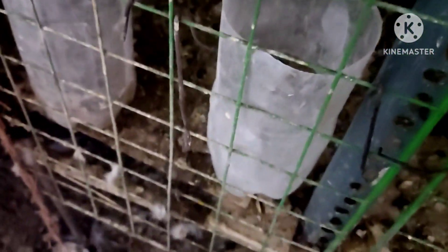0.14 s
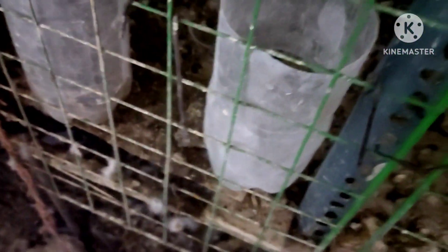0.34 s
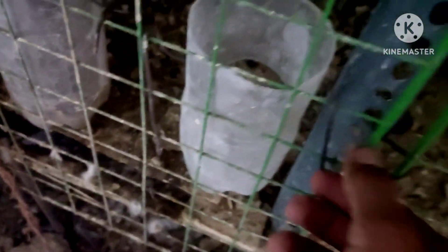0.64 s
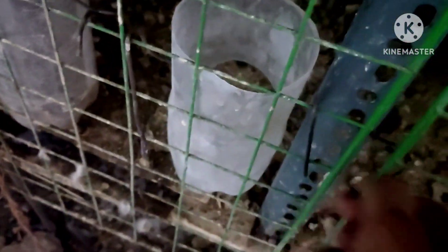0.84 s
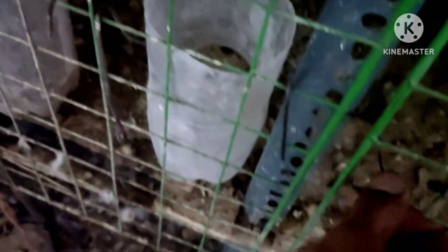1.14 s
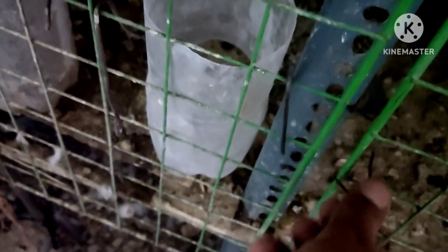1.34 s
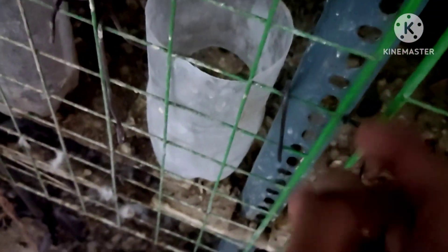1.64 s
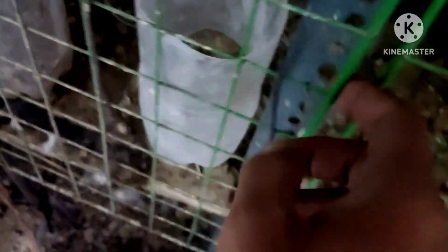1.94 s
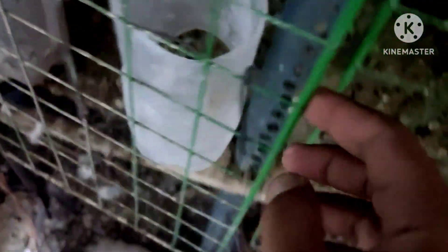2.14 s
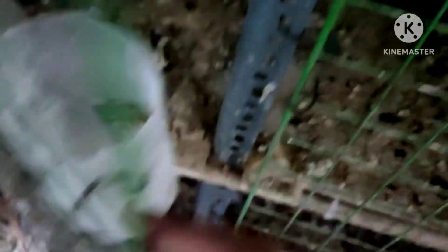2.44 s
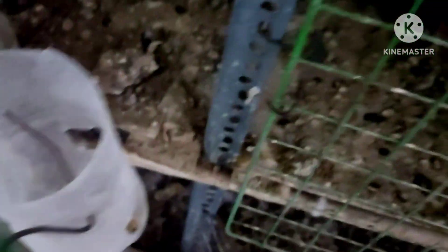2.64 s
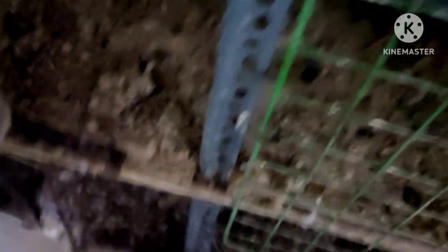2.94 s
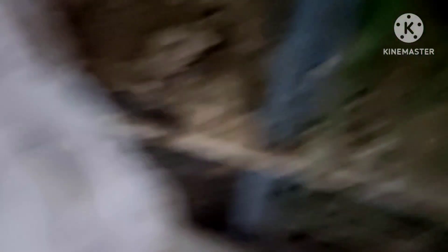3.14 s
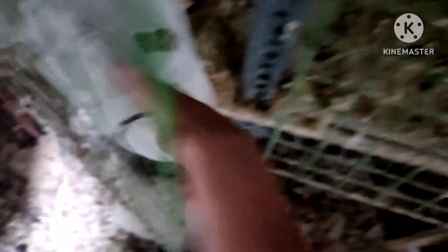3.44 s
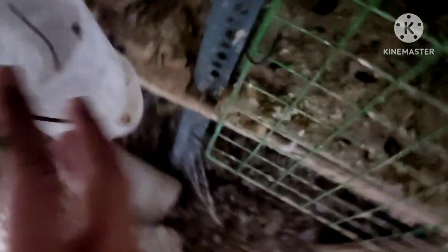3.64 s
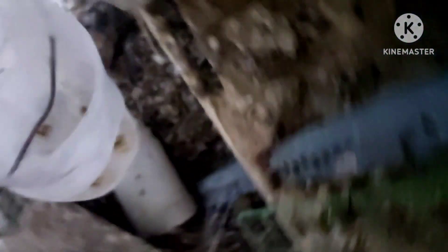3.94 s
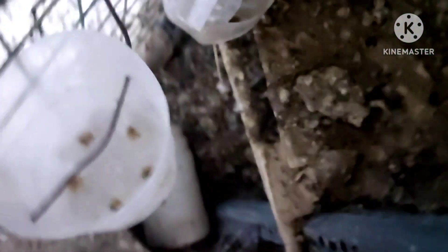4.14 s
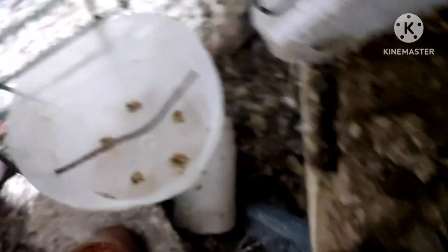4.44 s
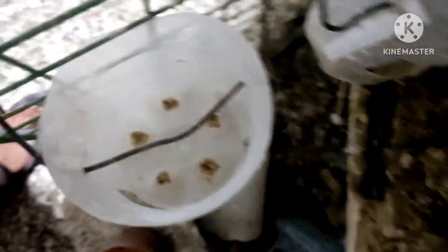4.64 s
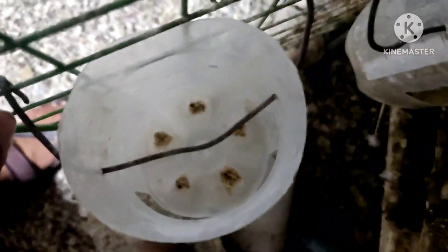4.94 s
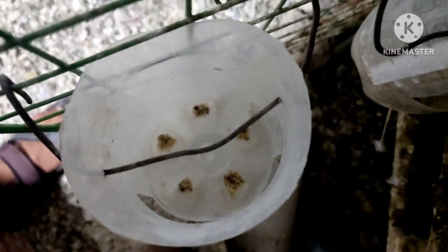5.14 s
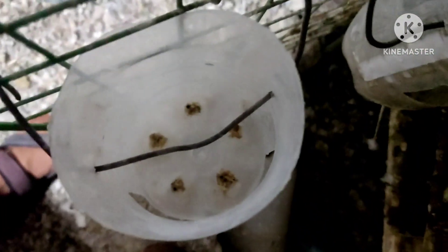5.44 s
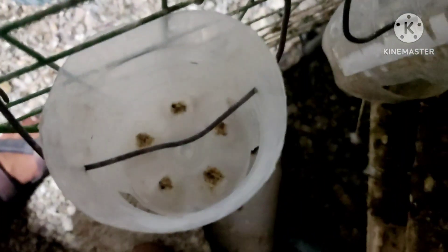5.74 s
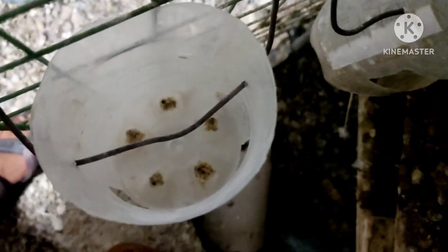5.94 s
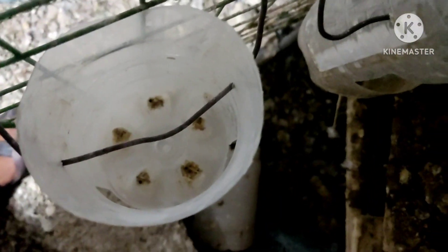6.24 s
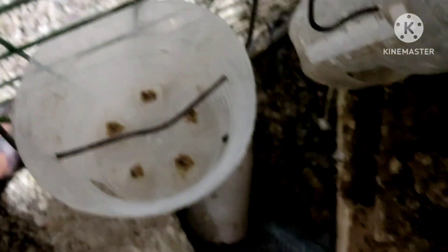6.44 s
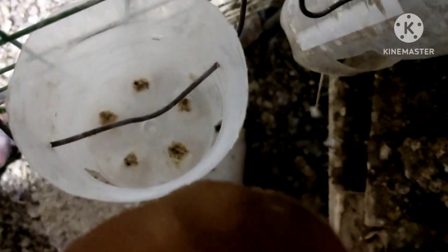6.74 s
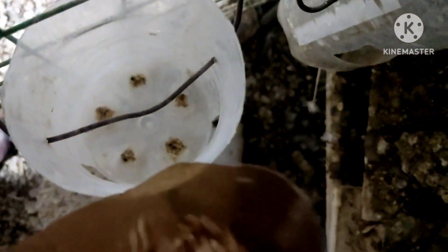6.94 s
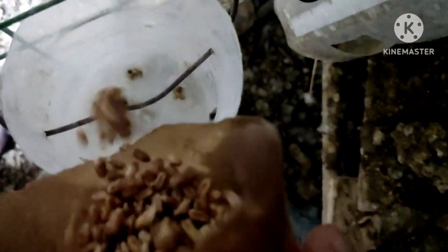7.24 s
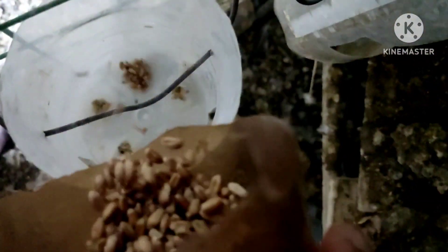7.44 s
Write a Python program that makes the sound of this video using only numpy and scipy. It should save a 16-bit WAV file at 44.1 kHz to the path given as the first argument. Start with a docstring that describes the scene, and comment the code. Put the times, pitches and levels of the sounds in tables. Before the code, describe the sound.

Close in a small pigeon loft, fingers knock and drag a wire door and plastic cup amid soft feathery rustling. Squabs give thin wavering whistles and an adult coos very faintly. The door swings with clattering mesh and low phone shudder; sharp finger taps thump the left side. After a quieter stretch, dry grain trickles, then rattles loudly into the hollow cup.

```python
"""Wire cage and grain in a pigeon loft

A hand drags and knocks a wire cage door and a plastic feed cup, then starts to pour grain: noise bursts and
grains of noise drive resonances and broad colours, seeds and wires add short damped sines.
Young pigeons peep in two-voiced sine whistles, an adult coos faintly; filtered noise makes feed and feathers rustle.
The hand-held phone rumbles as it moves; finger taps chirp through its casing, loudest on the left."""
import sys
import numpy as np
from scipy import signal
from scipy.fft import rfft, irfft, next_fast_len
from scipy.io import wavfile
from scipy.ndimage import map_coordinates

SR = 44100
rng = np.random.default_rng(int(sys.argv[2]) if len(sys.argv) > 2 else 0)


def master_out(mix):
    """Clip the mix to full scale and print it as 16-bit PCM to the path in sys.argv[1]."""
    frames = np.transpose(np.atleast_2d(mix))
    ceiling = np.clip(frames, -1, 1)
    pcm = np.round(ceiling * 32767).astype(np.int16)
    wavfile.write(sys.argv[1], SR, pcm)


N = 334278

# Relative levels are offset where they are used.
# Air and arm movement on the microphones. Each row: time in seconds, relative level in dB.
RUMBLE_LEVELS = [(0.0, -66), (0.46, -68), (1.12, -69), (1.35, -70.5), (1.83, -72), (2.7, -67), (3.08, -61),
                 (3.21, -52.5), (3.63, -63.5), (4.14, -51.5), (4.5, -68), (4.79, -59.5), (5.05, -72),
                 (5.83, -63), (6.33, -71), (6.93, -61), (7.11, -46), (7.58, -43.5)]
# Colour of the rumble. Each row: frequency in Hz, gain in dB.
BUFFET_COLOUR = [(8, 2.5), (22, 1.5), (45, -7), (80, -17.5), (160, -22), (400, -31), (2000, -100)]
# Colour of the phone's shudder. Each row: frequency in Hz, gain in dB.
JOLT_COLOUR = [(10, -8), (35, -6), (70, -8.5), (110, -12), (200, -27.5), (400, -65.5), (2000, -100)]
# Finger taps on the casing. Each row: time in seconds, peak in dB, corner in Hz (low: soft pad, high: nail).
FINGER_TAPS = [(2.1037, -39, 2010), (2.377, -44, 1710), (3.193, -38.5, 2630), (3.33, -33.5, 2800),
               (3.348, -22.5, 2110), (3.3752, -11, 1620), (3.454, -40, 2930), (3.475, -42, 2980),
               (3.986, -36.5, 2620), (4.336, -42, 1940), (4.496, -35.5, 2460), (4.53, -42, 1100),
               (5.4408, -6.5, 497), (5.699, -44, 1730), (6.086, -45.5, 1200), (6.489, -41.5, 860)]
# Spectrum of a fingertip's touch. Each row: frequency as a share of the corner, gain in dB.
TOUCH_COLOUR = [(.02, -26.5), (.12, -8), (.35, -4.5), (.62, 1), (.9, 0.5), (1.15, -7), (1.6, -28.5),
                (3.5, -37), (8, -67), (40, -94)]
# Transmission of the casing. Each row: frequency in Hz, gain in dB.
CASING_COLOUR = [(10, -59), (45, -16), (80, -1.5), (140, -6), (240, -1.5), (400, 1), (700, -3),
                 (1900, -5.5), (3000, 3), (4400, 11), (6000, 5), (8500, 8), (10500, -45), (16000, -67)]
# Adult coos. Each row: start in seconds, length in seconds, pitch in Hz, pitch rise in Hz per s, level in dB.
COO_NOTES = [(1.082, 0.13, 453.5, -130, -56), (1.254, 0.097, 420, 350, -52), (1.9, 0.049, 441, 100, -50)]
# Peeps of the far squab, one curve each. Each row: time in seconds, pitch in Hz, level in dB.
FAR_PEEP_CURVES = [
    [(0.015, 4020, -78), (0.06, 4020, -74), (0.12, 4040, -80), (0.19, 4075, -73), (0.26, 4075, -79),
     (0.29, 4068, -83), (0.314, 3991, -77), (0.338, 3679, -68), (0.35, 3589, -78)],
    [(6.44, 4279, -74), (6.484, 4331, -70), (6.53, 4300, -66), (6.566, 4277, -63), (6.59, 4308, -67),
     (6.61, 4198, -82)],
    [(6.63, 4259, -73), (6.66, 4312, -67), (6.68, 4332, -68), (6.698, 4273, -61), (6.712, 4190, -67),
     (6.738, 4083, -71)],
]
# Begging peeps of the near squab, one curve each.
# Each row: time in seconds, pitch in Hz, level in dB, octave level in dB.
NEAR_PEEP_CURVES = [
    [(2.04, 3270, -70, -80), (2.052, 3330, -67, -68), (2.095, 3370, -59.5, -82), (2.15, 3420, -61, -62),
     (2.23, 3510, -59, -63), (2.287, 3440, -58, -69), (2.305, 3603, -57, -57), (2.33, 3583, -54.5, -73),
     (2.378, 3545, -54, -67), (2.396, 3750, -68, -55), (2.414, 3670, -56, -63), (2.43, 3460, -62, -64),
     (2.45, 3460, -68, -71)],
    [(3.388, 3280, -66, -64), (3.435, 3320, -72, -75), (3.452, 3420, -60, -56), (3.476, 3550, -55.5, -57),
     (3.5, 3480, -64, -62), (3.523, 3310, -55, -63)],
    [(4.56, 3175, -69, -86), (4.605, 3320, -69, -71), (4.675, 3495, -65, -58.5), (4.705, 3460, -66, -57),
     (4.76, 3497, -63, -59.5), (4.8, 3445, -66, -55), (4.82, 3580, -64, -60), (4.85, 3520, -62, -56),
     (4.895, 3730, -67, -63), (4.95, 3740, -71, -65), (4.978, 3570, -70, -54), (5.005, 3655, -63, -67),
     (5.028, 3696, -57, -63), (5.048, 3540, -69, -58)],
]
# Second voice of the near peeps. Each row: start in seconds, length in seconds, gap above the first in Hz
# at HELD_HZ, level in dB, time of its swell in seconds, swell in dB.
UPPER_VOICES = [(2.3, 0.125, 490, -61, 2.35, 6), (3.47, 0.035, 600, -68, 3.485, 2),
                (4.812, 0.23, 640, -66.5, 4.995, 8.5)]
# Feed and feathers stirring. Each row: time in seconds, relative body level in dB, relative hiss level in dB.
RUSTLE_LEVELS = [(0.0, -59, -57), (0.07, -55.5, -62), (0.15, -72, -65), (0.19, -61.5, -52), (0.3, -70, -66),
                 (0.43, -64.5, -58), (0.46, -74, -65), (0.53, -60, -61.5), (0.6, -70, -66.5),
                 (0.69, -63.5, -67), (0.72, -63, -62.5), (1.0, -61, -66.5), (1.2, -64.5, -75),
                 (1.41, -61, -59), (1.6, -64.5, -64.5), (1.99, -61.5, -68.5), (2.29, -67.5, -65),
                 (2.44, -66.5, -71), (2.84, -72, -72.5), (3.1, -69.5, -69.5), (3.25, -60, -74),
                 (3.57, -70, -66), (3.74, -56.5, -103), (3.93, -71, -67.5), (4.15, -60.5, -68),
                 (4.28, -69.5, -69.5), (4.55, -68.5, -75.5), (4.89, -68, -61.5), (5.15, -66, -66),
                 (5.66, -69.5, -70.5), (5.85, -67.5, -67.5), (5.98, -71, -67.5), (6.35, -68, -63.5),
                 (6.46, -68, -69), (6.63, -69.5, -64), (6.75, -74, -61)]
# Fingers brushing the plastic cup. Each row: centre in seconds, half length to 1/e in seconds,
# plastic level in dB, hiss level in dB.
CUP_BRUSHES = [(1.756, 0.019, -71.5, -70), (1.844, 0.016, -59, -61), (2.284, 0.0083, -65, -63.5),
               (3.295, 0.0066, -68, -57.5), (4.682, 0.024, -63.5, -74), (4.847, 0.016, -68, -79),
               (5.065, 0.014, -59.5, -70), (5.178, 0.0074, -56, -63), (5.43, 0.026, -58.5, -75),
               (5.47, 0.016, -65, -66.5), (5.856, 0.03, -88, -66.5), (6.334, 0.019, -70, -74)]
# Colour of feed and feather body. Each row: frequency in Hz, gain in dB.
BODY_COLOUR = [(30, 0.5), (110, 3), (190, 7.5), (400, 2), (700, -6), (1100, -7), (2200, -13), (3500, -20),
               (7000, -31.5), (16000, -45.5)]
# Colour of hiss and ticks. Each row: frequency in Hz, gain in dB.
HISS_COLOUR = [(500, -32), (2500, -9.5), (4000, -10), (5700, -7), (7200, 0.5), (8300, -7.5), (9200, -13),
               (9800, -22.5), (13000, -32), (16000, -50.5)]
# Colour of struck plastic. Each row: frequency in Hz, gain in dB.
CLACK_COLOUR = [(200, -14), (900, -8.5), (1600, 1.5), (2200, 1.5), (2800, -1.5), (3500, -5.5), (5000, -9),
                (9000, -29), (16000, -80)]
# Single pitches of cup or mesh. Each row: time in seconds, pitch in Hz, level in dB, t60 in seconds.
SINGLE_PINGS = [(0.09, 528, -41, 0.084), (0.092, 1018, -38, 0.051), (0.093, 1642, -36.5, 0.038),
                (0.647, 4970, -45, 0.015), (0.664, 526, -44.5, 0.052), (0.664, 1028, -47.5, 0.067),
                (0.86, 886, -46, 0.27), (1.039, 1665, -36, 0.073), (1.043, 2240, -33, 0.081),
                (1.947, 272, -48, 0.11), (2.633, 1576, -57.5, 0.19), (4.08, 785, -41, 0.022),
                (4.081, 1403, -37.5, 0.067), (6.411, 360, -41.5, 0.044), (6.525, 655, -46, 0.07),
                (6.574, 678, -51.5, 0.11), (6.995, 703, -36.5, 0.03), (7.194, 195, -35.5, 0.063),
                (7.274, 423, -30.5, 0.048), (7.294, 560, -17.5, 0.017), (7.388, 545, -25, 0.032),
                (7.471, 2760, -38, 0.06), (7.476, 269, -24.5, 0.061), (7.492, 765, -23, 0.029),
                (7.509, 1100, -30, 0.024), (7.535, 858, -26, 0.032), (7.553, 3020, -29, 0.016)]
# Loose wires rattling. Each row: start in seconds, end in seconds, level in dB.
WIRE_RATTLES = [(1.04, 1.08, -46.5), (1.082, 1.22, -58.5), (1.299, 1.36, -64), (3.538, 3.65, -48.5),
                (3.72, 3.75, -56), (4.209, 4.289, -63.5)]
# Pushes on the wire door. Each row: start in seconds, length in seconds, relative mesh level in dB,
# relative frame level in dB, relative scrape level in dB.
DOOR_DRAGS = [(0.06, 0.0075, -49, -65, -50), (0.798, 0.043, -35, -53, -61.5),
              (1.048, 0.03, -50, -51.5, -43.5), (1.1, 0.21, -54, -61, -66), (1.87, 0.051, -48, -65.5, -51),
              (3.127, 0.23, -51, -72.5, -66.5), (3.568, 0.051, -33.5, -58, -57),
              (3.717, 0.088, -50, -70.5, -68), (4.075, 0.23, -63, -66.5, -92),
              (4.481, 0.033, -79, -88, -61), (6.187, 0.0065, -67, -83.5, -58.5),
              (6.513, 0.019, -52, -60, -64)]
# Knocks of wire and cup. Each row: time in seconds, then relative levels in dB of tick, mesh ring,
# plastic clack and sizzle, then decay scale in seconds.
DOOR_KNOCKS = [(0.091, -44, -39, -42, -49, 0.025), (0.486, -52.5, -52.5, -62, -76, 0.039),
               (0.53, -51, -59, -59, -61, 0.038), (0.646, -47, -75, -57, -85, 0.019),
               (0.663, -52, -55, -54, -78, 0.022), (0.8017, -51.5, -47.5, -48.5, -87, 0.2),
               (1.01, -46, -44, -50, -78, 0.032), (1.039, -32.5, -54, -34.5, -36.5, 0.11),
               (1.059, -45, -52, -60, -46, 0.16), (1.131, -46, -62, -55, -70, 0.28),
               (1.239, -59, -47, -44, -72, 0.033), (1.251, -23, -40, -53, -38, 0.019),
               (1.3007, -45.5, -56.5, -53, -56.5, 0.32), (1.9478, -64, -43.5, -54, -82, 0.09),
               (2.152, -62, -72, -75, -85, 0.022), (2.6265, -55.5, -67.5, -62.5, -75, 0.13),
               (2.8, -55, -69, -71, -70, 0.15), (3.027, -49.5, -78, -51, -80, 0.036),
               (3.1051, -41, -29.5, -41, -46.5, 0.075), (3.5373, -28.5, -33, -39.5, -41, 0.09),
               (3.564, -39, -43, -41, -66, 0.024), (3.593, -45, -34.5, -51, -74, 0.023),
               (3.613, -35, -42.5, -52, -69, 0.06), (3.631, -45, -56, -48, -70, 0.039),
               (3.704, -47, -49, -58, -80, 0.02), (3.721, -42.5, -34.5, -39.5, -76, 0.021),
               (3.762, -53, -52, -71, -80, 0.041), (3.903, -53, -54, -58, -78, 0.038),
               (3.92, -51, -40, -47.5, -78, 0.039), (3.986, -60, -54, -48, -80, 0.012),
               (3.996, -68, -48, -47.5, -80, 0.015), (4.08, -44, -44, -38.5, -78, 0.021),
               (4.137, -42, -49, -54, -75, 0.019), (4.193, -46, -46, -46, -72, 0.021),
               (4.2162, -44, -43, -49, -72, 0.025), (4.229, -50, -56, -48, -78, 0.025),
               (4.2603, -53, -50, -67, -80, 0.02), (4.27, -43, -48, -57, -72, 0.028),
               (4.358, -56, -75, -57, -85, 0.014), (4.696, -59, -56, -62, -85, 0.093),
               (4.917, -46, -59, -57, -55, 0.045), (5.1565, -46.5, -73, -56.5, -66, 0.048),
               (5.1775, -53, -76, -62, -52, 0.019), (5.36, -44.5, -85, -74, -72, 0.02),
               (6.039, -49, -49.5, -56, -78, 0.022), (6.407, -41, -54, -45.5, -76, 0.031),
               (6.5008, -46, -59, -50, -50, 0.028), (6.624, -52, -75, -57, -78, 0.029),
               (6.664, -37.5, -81, -57, -64, 0.015)]
# Modes of the mesh. Each row: frequency in Hz, width in Hz, gain in dB.
MESH_MODES = [(542, 13, -6), (653.7, 40, -5), (817, 50, -9), (865, 15, 2.5), (935, 177, -4), (974, 24, 2.5),
              (1140, 51, -31), (1300, 37, -13), (1353, 49, -6.5), (1444, 155, -6), (1640, 62, -24.5),
              (1880, 9.1, -32.5), (2510, 47, -14.5), (2840, 79, -19.5)]
# Modes of the heavier frame. Each row: frequency in Hz, width in Hz, gain in dB.
FRAME_MODES = [(150.7, 15, 6), (196, 38, 1.5), (263, 66, -1.5), (317.4, 40, 2.5), (443, 26, 2.5),
               (561, 41, 1.5)]
# Modes of the zinging wire. Each row: frequency in Hz, width in Hz, gain in dB.
WIRE_MODES = [(4120, 98, -41), (5470, 43, 1), (5640, 58, -24), (5910, 60, -25), (6420, 130, -4),
              (6975, 100, 6), (7700, 61, 1), (7940, 150, -12), (8600, 210, -9)]
# Sizzle of knocks. Each row: frequency in Hz, gain in dB.
KNOCK_SIZZLE_COLOUR = [(3000, -50), (8000, 2.5), (10000, -4), (12500, -13), (16000, -9)]
# Grain sliding out of the hand. Each row: time in seconds, relative patter level in dB, relative hiss level in dB.
POUR_LEVELS = [(6.764, -62, -56), (6.816, -61, -58), (6.938, -59.5, -54), (7.054, -53, -43),
               (7.168, -51.5, -52.5), (7.366, -49.5, -58), (7.484, -47, -52), (7.58, -50, -53)]
# Clumps of grain landing. Each row: time in seconds, relative levels in dB of tick, cup and sizzle,
# decay scale in seconds.
GRAIN_CLUMPS = [(6.766, -42.5, -43, -75, 0.035), (6.835, -24.5, -63, -52, 0.013),
                (6.85, -40, -64, -60, 0.015), (6.865, -57, -51, -75, 0.032),
                (6.906, -26.5, -62, -50, 0.013), (6.9167, -29, -54, -64, 0.015),
                (6.9344, -36, -39.5, -68, 0.028), (6.9731, -20.5, -50, -44, 0.019),
                (6.9948, -20, -35, -54, 0.023), (7.005, -27.5, -39, -48, 0.044),
                (7.036, -33, -55, -58, 0.012), (7.056, -40, -52, -54, 0.012), (7.084, -33, -36, -62, 0.016),
                (7.1113, -26.5, -32.5, -62, 0.036), (7.162, -27, -50, -64, 0.022),
                (7.176, -28, -50, -60, 0.014), (7.223, -49, -37, -64, 0.015), (7.249, -42, -52, -58, 0.013),
                (7.2926, -24, -31, -46, 0.066), (7.306, -17, -33, -45, 0.015),
                (7.3987, -13, -30, -28, 0.018), (7.415, -24, -36, -52, 0.017),
                (7.4681, -28.5, -29, -55, 0.017), (7.488, -34, -30, -60, 0.018),
                (7.5274, -19.5, -27, -60, 0.035), (7.5318, -19, -38, -57, 0.016),
                (7.551, -27, -37, -56, 0.039), (7.5714, -19, -30, -37, 0.095)]
# Colour of the feed cup. Each row: frequency in Hz, gain in dB.
CUP_COLOUR = [(40, -43), (160, -1.5), (270, 7.5), (450, 3), (870, -0.5), (1500, -1), (2800, -5),
              (4500, -3.5), (9000, -20), (16000, -36)]
# Sizzle of seeds. Each row: frequency in Hz, gain in dB.
SEED_SIZZLE_COLOUR = [(3000, -32), (8500, 3), (10500, 2), (13000, -6), (16000, -18)]
# Stereo spread of a source. Each row: frequency in Hz, left-right likeness from 0 to 1.
SIDE_LIKENESS = [(40, 0.85), (200, 0.92), (640, 0.49), (1400, 0.1), (4000, 0), (15000, 0.1)]
# Decay of the loft. Each row: frequency in Hz, t60 in seconds.
LOFT_DECAY = [(150, 0.38), (900, 0.13), (3000, 0.2), (7000, 0.08), (14000, 0.033)]
# Balance of the microphone ports. Each row: frequency in Hz, left minus right in dB.
PORT_BALANCE = [(40, 8), (200, 8), (700, 3), (1300, 6.5), (2400, 3.5), (4400, 0), (5600, -3), (7200, -15),
                (8300, -5.5), (9500, -1), (15000, -1)]

TOP_HZ = 15700
HELD_HZ, UPPER_SWING = 3720, 1.45  # the second voice bends further about this first-voice pitch
UPPER_OCTAVE_DB, FAR_OCTAVE_DB = -11.5, -16  # octave relative to its sine
SWELL_HALF_WIDTH_S = 0.03
DRAG_RISE_DB_PER_S, MESH_FALL_DB_PER_S, FRAME_FALL_DB_PER_S = 589, 280, 187
RATTLES_PER_S = 270
ECHO_FIRST_S, ECHO_LAST_S, ECHO_DB, ECHO_FALL_DB_PER_S = 0.0008, 0.016, -10, 900
CAGE_ROOM_DB, FEED_ROOM_DB, BIRDS_ROOM_DB, TAPS_ROOM_DB = -12.0, -13.5, -11, -37.5


def amp(db):
    """Decibels to gain."""
    return 10 ** (np.asarray(db) / 20)


def unit(x):
    """Scale to rms 1."""
    return x / np.sqrt(np.mean(x ** 2) + 1e-20)


def along(points, hz):
    """Read (Hz, value) points on a log frequency axis."""
    point_hz, values = np.transpose(points)
    return np.interp(np.log(hz + 1e-6), np.log(point_hz), values)


def curves(rows):
    """One value per sample for each column after the time."""
    times_s, *columns = np.transpose(rows)
    return [np.interp(np.arange(N) / SR, times_s, column) for column in columns]


def gate(rows, fade_s):
    """1 while a curve lasts, with linear ends outside it."""
    t = np.arange(N) / SR
    return np.clip(np.minimum(t - rows[0][0], rows[-1][0] - t) / fade_s + 1, 0, 1)


def stroke(start_s, length_s, rise_db_per_s, fall_db_per_s):
    """Gain of 1 from start for length, rising before and falling after at steady dB rates."""
    t = np.arange(N) / SR - start_s
    loss_db = np.maximum(-t * rise_db_per_s, (t - length_s) * fall_db_per_s)
    return amp(-np.clip(loss_db, 0, 200))


def wobble(knots_per_s):
    """A smooth random curve."""
    knots = rng.standard_normal(int(N * knots_per_s / SR) + 4)
    return map_coordinates(knots, [np.arange(N) * knots_per_s / SR], order=2)


def filtered(x, response):
    """x times a complex response of frequency."""
    m = next_fast_len(x.shape[-1] + SR // 4)
    return irfft(rfft(x, m) * response(np.fft.rfftfreq(m, 1 / SR)), m)[..., :x.shape[-1]]


def add(track, s, sound):
    """Mix a sound in at time s in seconds."""
    i = max(round(s * SR), 0)
    part = track[..., i:i + sound.shape[-1]]
    part += sound[..., :part.shape[-1]]


def spectrum(points):
    """Zero-phase response of (Hz, dB) points."""
    return lambda hz: amp(along(points, hz))


def resonances(modes):
    """Causal response of (Hz, width, dB) modes, alternating in sign."""
    def response(hz):
        total = 0
        for k, (centre_hz, width_hz, db) in enumerate(modes):
            damping = 1j * hz * width_hz
            total = total + (-1) ** k * amp(db) * damping / (centre_hz ** 2 - hz ** 2 + damping)
        return total
    return response


def radiate(force, colour):
    """Colour two unrelated forces without changing white-noise power; bass reaches both sides more alike."""
    def response(hz):
        turn = np.arccos(np.clip(along(SIDE_LIKENESS, hz), -1, 1)) / 2
        gain = colour(hz)
        return gain / np.sqrt(np.mean(abs(gain) ** 2)) * np.array([np.cos(turn), np.sin(turn)])
    mid, side = filtered(force, response)
    return np.array([mid + side, mid - side])


def crackle(rate_per_s, spread_db, t60_s, smooth):
    """Stereo noise in grains of unequal size, each decaying, over a smooth share of power; near rms 1."""
    struck = rng.random(N) < rate_per_s / SR
    sizes = struck * amp(spread_db * np.minimum(rng.exponential(size=N), 4))
    power_decay = amp(-120 * np.arange(SR // 10) / SR / t60_s)
    power = abs(signal.fftconvolve(sizes ** 2, power_decay)[:N])
    share = np.clip(smooth, 0, 1)
    return np.sqrt(share + (1 - share) * power / power.mean()) * rng.standard_normal((2, N))


def blows(times_s, levels_db, lives_s, rise_s, chatter_db, lead_db=-16, lead_s=0.0021):
    """Each contact is a short, chattering burst of force with a faint, soft noise swell around its start."""
    before = SR // 40
    force, t = np.zeros(N), np.arange(-before, SR // 3) / SR
    after = np.maximum(t, 0)
    lead = amp(lead_db) * np.exp(-abs(t) / lead_s)
    for s, db, t60_s in zip(times_s, levels_db, lives_s):
        burst = amp(-60 * after / max(t60_s, .005)) * (1 - np.exp(-after / rise_s))
        add(force, s - before / SR, amp(db) * (lead + burst))
    return force * unit(amp(chatter_db * wobble(500)) * rng.standard_normal((2, N)))


def seeds(start_s, end_s, count, centre_hz, scatter, cycles, spread_db):
    """Small things bounce at random times, each ringing its own pitch for a few cycles; rms 1 meanwhile."""
    bounces, t = np.zeros((2, N)), np.arange(SR // 8) / SR
    for s, (pitch, size, skew) in zip(rng.uniform(start_s, end_s, count), rng.standard_normal((count, 3))):
        hz = np.clip(centre_hz * np.exp(scatter * pitch), 240, 4000)
        fade = amp(spread_db * np.clip(size, -2, 2) - 60 * t * hz / cycles) * np.sqrt(hz)
        ring = np.sin(2 * np.pi * hz * t + np.array([[0], [skew]]))  # right side out of phase by skew
        add(bounces, s, fade * ring * (1 - np.exp(-t * hz)))
    return unit(bounces) * np.sqrt(abs(end_s - start_s) * SR / N)


def clicks(rate_per_s, spread_db):
    """Hard seeds click together: single sharp impulses of unequal size, rms 1."""
    hits = rng.random(N) < rate_per_s / SR
    sizes = amp(spread_db * np.clip(rng.standard_normal(N), -2, 2))
    return unit(hits * sizes * rng.standard_normal((2, N)))


def whistle(pitch_hz, level_db, octave_db, waver, flutter_db):
    """One side of a syrinx: a slightly unsteady sine and its octave, fluttering in level."""
    phase = 2 * np.pi * np.cumsum(pitch_hz * (1 + waver * wobble(130))) / SR
    tone = amp(level_db) * np.sin(phase) + amp(octave_db) * np.sin(2 * phase)
    return amp(flutter_db * wobble(90)) * tone


def handling(jolt_s=3.092, jolt_db=-29, jolt_t60_s=0.32):
    """The moving phone rumbles in lumps, and shudders when the door swings free."""
    level_db, = curves(RUMBLE_LEVELS)
    sway = amp(level_db + 7.5 + 4.4 * wobble(12)) * rng.standard_normal((2, N))
    shudder = blows([jolt_s], [jolt_db], [jolt_t60_s], rise_s=0.0011, chatter_db=7.0)
    jolt = radiate(shudder, spectrum(JOLT_COLOUR))
    return radiate(sway, spectrum(BUFFET_COLOUR)) + jolt * amp([[0], [-18]])  # weaker on the right


def fingers(lag_cycles=1.6, slowest_hz=50, ring_hz=203, ring_width_hz=7, ring_db=-5, leak_db=-31):
    """Taps cross the casing as bending waves: treble arrives first, so each is a quick downward chirp."""
    taps, hz = np.zeros(N), np.fft.rfftfreq(SR // 2, 1 / SR) + 1
    before = SR // 20
    bending = np.exp(-2j * np.pi * lag_cycles * np.log(hz + slowest_hz))
    ring = resonances([(ring_hz, ring_width_hz, ring_db)])(hz)
    casing = bending * spectrum(CASING_COLOUR)(hz) * (0.5 + ring)
    for s, peak_db, corner_hz in FINGER_TAPS:
        touch = amp(along(TOUCH_COLOUR, hz / corner_hz))
        chirp = np.roll(irfft(touch * casing), before)
        add(taps, s - before / SR, amp(peak_db) * chirp / abs(chirp).max())
    return np.array([taps, amp(leak_db) * taps])


def coo(rough=0.03):
    """Soft, husky adult notes: sines that bend a little, with unsteady pitch and level."""
    t, voice = np.arange(N) / SR, np.zeros(N)
    for start_s, length_s, hz, rise_hz_per_s, db in COO_NOTES:
        bent_hz = hz + rise_hz_per_s * np.clip(t - start_s, 0, length_s)
        pitch_hz = bent_hz * (1 + rough * wobble(70.1))
        level = stroke(start_s, length_s, 560, 800) * amp(db + 2.6 * wobble(35.15))
        voice += level * np.sin(2 * np.pi * np.cumsum(pitch_hz) / SR)
    return voice


def far_squab():
    """Faint one-voiced whistles that swell and droop at their ends."""
    voice = np.zeros(N)
    for rows in FAR_PEEP_CURVES:
        pitch_hz, level_db = curves(rows)
        peep = whistle(pitch_hz, level_db, level_db + FAR_OCTAVE_DB, waver=0.004, flutter_db=1.2)
        voice += gate(rows, 0.008) * peep
    return voice


def squabs():
    """The near squab's thin whistle; the other side of its syrinx joins above, follows each bend and swells."""
    t, voice = np.arange(N) / SR, np.zeros(N)
    for rows, (start_s, length_s, gap_hz, db, swell_s, swell_db) in zip(NEAR_PEEP_CURVES, UPPER_VOICES):
        pitch_hz, level_db, octave_db = curves(rows)
        upper_db = db + swell_db / (1 + ((t - swell_s) / SWELL_HALF_WIDTH_S) ** 4)
        upper_hz = HELD_HZ + gap_hz + UPPER_SWING * (pitch_hz - HELD_HZ)
        lower = whistle(pitch_hz, level_db, octave_db, waver=0.004, flutter_db=1.5)
        upper = whistle(upper_hz, upper_db, upper_db + UPPER_OCTAVE_DB, waver=0.005, flutter_db=1.5)
        voice += gate(rows, 0.011) * lower + stroke(start_s, length_s, 1800, 1500) * upper
    return voice


def rustle():
    """Feed and feathers stir in a soft, shifting hiss; fingers brush the cup in short swells."""
    t = np.arange(N) / SR
    body_db, hiss_db = curves(RUSTLE_LEVELS)
    stirs = crackle(rate_per_s=260, spread_db=1.5, t60_s=0.057, smooth=0.4) * amp(1.5 * wobble(22))
    specks = crackle(rate_per_s=260, spread_db=3, t60_s=0.03, smooth=0.45) * amp(2 * wobble(22))
    plastic, brush_hiss = np.zeros((2, N))
    for s, half_length_s, plastic_db, brush_db in CUP_BRUSHES:
        swell = np.exp(-np.minimum(((t - s) / half_length_s) ** 2, 20))
        plastic += amp(plastic_db) * swell
        brush_hiss += amp(brush_db) * swell
    grit = crackle(rate_per_s=670, spread_db=3.5, t60_s=0.012, smooth=0.4)
    treble = radiate(amp(hiss_db - 3.0) * specks + brush_hiss * grit, spectrum(HISS_COLOUR))
    body = radiate(amp(body_db + 1.5) * stirs, spectrum(BODY_COLOUR))
    return treble + body + radiate(plastic * grit, spectrum(CLACK_COLOUR))


def rattles():
    """Loose wires chatter against the mesh, each contact at its own pitch."""
    chatter = np.zeros((2, N))
    for start_s, end_s, db in WIRE_RATTLES:
        count = 1 + int(abs(end_s - start_s) * RATTLES_PER_S)
        chatter += amp(db) * seeds(start_s, end_s, count, centre_hz=1500, scatter=0.42, cycles=50, spread_db=3.5)
    return chatter


def pings(rise_s=0.0019):
    """A glancing touch of seed or wire leaves one short, damped pitch."""
    ring, t = np.zeros(N), np.arange(SR // 3) / SR
    for s, hz, db, t60_s in SINGLE_PINGS:
        envelope = amp(db - 60 * t / t60_s) * (1 - np.exp(-t / rise_s))
        add(ring, s, envelope * np.sin(2 * np.pi * hz * t))
    return ring


def door():
    """Drags and knocks ring mesh and frame, with scrape, plastic clack, bright tick, wiry zing and sizzle."""
    mesh, frame, scrape = np.zeros((3, N))
    for start_s, length_s, mesh_db, frame_db, scrape_db in DOOR_DRAGS:
        push = stroke(start_s, length_s, DRAG_RISE_DB_PER_S, MESH_FALL_DB_PER_S)
        mesh += amp(mesh_db - 10.5) * push
        scrape += amp(scrape_db) * push
        frame += amp(frame_db + 4.5) * stroke(start_s, length_s, DRAG_RISE_DB_PER_S, FRAME_FALL_DB_PER_S)
    slips = crackle(rate_per_s=140, spread_db=-3.5, t60_s=0.011, smooth=0.35)
    scratch = scrape * crackle(rate_per_s=1000, spread_db=5.0, t60_s=0.028, smooth=0.14)

    s, tick_db, ring_db, clack_db, sizzle_db, life_s = np.transpose(DOOR_KNOCKS)
    mesh_blows = blows(s, ring_db + 6.0, life_s * 0.73, rise_s=0.0019, chatter_db=4.0)
    frame_blows = blows(s, ring_db - 8.5, life_s * 1.22, rise_s=0.00089, chatter_db=3.0)
    clack_blows = blows(s, clack_db + 3, life_s * 1.23, rise_s=0.0028, chatter_db=-0.5)
    tick_blows = blows(s, tick_db - 1.0, life_s * 0.86, rise_s=0.0005, chatter_db=2)
    zing_blows = blows(s, tick_db, life_s * 0.19, rise_s=0.0013, chatter_db=-6.5)
    sizzle_blows = blows(s, sizzle_db, life_s, rise_s=0.0015, chatter_db=8.5)

    ring = radiate(mesh * slips + mesh_blows, resonances(MESH_MODES))
    hum = radiate(frame * slips + frame_blows, resonances(FRAME_MODES))
    clack = radiate(amp(-3.0) * scrape * slips + clack_blows, spectrum(CLACK_COLOUR))
    tick = radiate(scratch + tick_blows, spectrum(HISS_COLOUR))
    zing = radiate(zing_blows, resonances(WIRE_MODES))
    sizzle = radiate(amp(-45) * scratch + sizzle_blows, spectrum(KNOCK_SIZZLE_COLOUR))
    return ring + hum + clack + tick + zing + sizzle


def grain():
    """Seeds slide over each other in a dense crackle and drop into the cup singly and in rattling clumps."""
    body_db, hiss_db = curves(POUR_LEVELS)
    flow, span = gate(POUR_LEVELS, 0.0046), (POUR_LEVELS[0][0], POUR_LEVELS[-1][0])
    sliding = crackle(rate_per_s=570, spread_db=4.5, t60_s=0.005, smooth=0.36)
    pattering = crackle(rate_per_s=390, spread_db=1.0, t60_s=0.043, smooth=0.29)
    bouncing = seeds(*span, count=170, centre_hz=993, scatter=0.61, cycles=27, spread_db=2.5)
    rattling = seeds(*span, count=120, centre_hz=2000, scatter=0.5, cycles=8, spread_db=5)
    slide = flow * amp(hiss_db + 4.0) * sliding
    husks = flow * amp(hiss_db - 2.5) * clicks(rate_per_s=420, spread_db=-1.5)
    patter = flow * amp(body_db + 3.5) * pattering
    kernels = flow * amp(body_db - 11) * clicks(rate_per_s=260, spread_db=3.0)
    bounces = flow * amp(body_db - 3.0) * bouncing
    rattle = flow * amp(body_db - 2.5) * rattling

    s, tick_db, cup_db, sizzle_db, life_s = np.transpose(GRAIN_CLUMPS)
    ticks = blows(s, tick_db, life_s * 0.42, rise_s=0.0004, chatter_db=3, lead_db=-22)
    thuds = blows(s, cup_db - 3.5, life_s * 1.75, rise_s=0.00078, chatter_db=1.5, lead_db=-22)
    clacks = blows(s, cup_db - 7, life_s * 0.7, rise_s=0.0005, chatter_db=4, lead_db=-22)
    fizz = blows(s, sizzle_db, life_s * 0.48, rise_s=0.00022, chatter_db=-5, lead_db=-8)

    hiss = radiate(slide + husks + ticks, spectrum(HISS_COLOUR))
    plastic = radiate(kernels + clacks, spectrum(CLACK_COLOUR))
    sizzle = radiate(fizz, spectrum(SEED_SIZZLE_COLOUR))
    cup = radiate(patter + thuds, spectrum(CUP_COLOUR))
    return hiss + plastic + sizzle + cup + bounces + rattle


def loft(x):
    """The close walls answer with a short tail of decaying noise, a different one on each side."""
    hz, t, z = signal.stft(rng.standard_normal((2, SR // 2)), SR, nperseg=256)
    decay = amp(-60 * t / along(LOFT_DECAY, hz)[:, None])
    tail = signal.istft(z * decay, SR, nperseg=256)[1]
    tail = np.pad(tail, ((0, 0), (SR // 200, 0)))  # 5 ms before the tail
    return signal.fftconvolve(x, tail / np.linalg.norm(tail[0]), axes=1)[:, :N]


def walls(x, count=9, size=32768):
    """Early echoes off cup, shelf and wall comb each side, later ones weaker; delays shift as the phone moves."""
    heard = np.zeros((2, N + size))
    padded, fade = np.pad(x, ((0, 0), (size // 2, size))), signal.get_window("hann", size)
    for i in range(0, N + size // 2, size // 2):  # overlapping blocks, new delays in each
        part = padded[:, i:i + size] * fade
        add(heard, i / SR, part)
        for pair in rng.uniform(ECHO_FIRST_S, ECHO_LAST_S, (count, 2)):
            for side, delay_s in enumerate(pair):
                echo = amp(ECHO_DB - ECHO_FALL_DB_PER_S * delay_s) * part[side]
                add(heard[side], i / SR + delay_s, echo)
    return heard[:, size // 2:size // 2 + N]


def ports(x):
    """The left port hears more bass; the right one has a treble resonance."""
    def response(hz):
        ratio = amp(along(PORT_BALANCE, hz))
        return np.array([ratio, np.ones_like(ratio)]) * np.sqrt(2 / (1 + ratio ** 2))
    return filtered(x, response)


def scene():
    """Airborne sounds fill the loft; the taps reach the microphones mostly through the casing."""
    cage = door() + pings() + rattles()
    feed = grain()
    birds = squabs() + far_squab() + coo()
    taps = fingers()
    room_feed = amp(CAGE_ROOM_DB) * cage + amp(FEED_ROOM_DB) * feed
    room = loft(room_feed + amp(BIRDS_ROOM_DB) * birds + amp(TAPS_ROOM_DB) * taps)
    return ports(walls(cage + feed + rustle()) + birds + room + handling()) + taps


def record(dry):
    """The phone's band limit: a very steep low-pass."""
    return filtered(dry, lambda hz: 1 / (1 + (hz / TOP_HZ) ** 80))


dry = scene()
out = record(dry)
master_out(out)
```